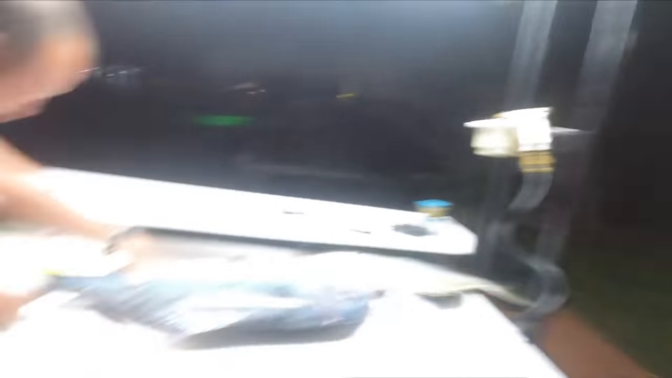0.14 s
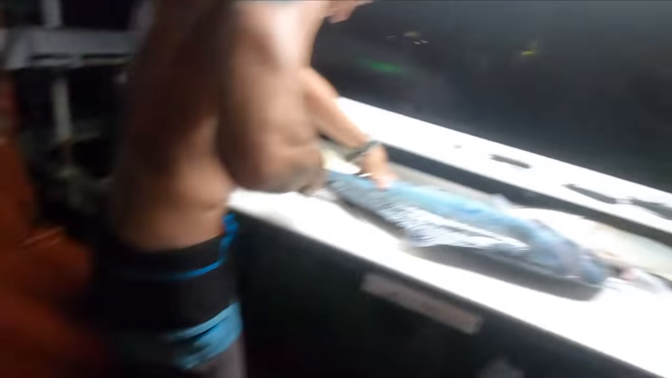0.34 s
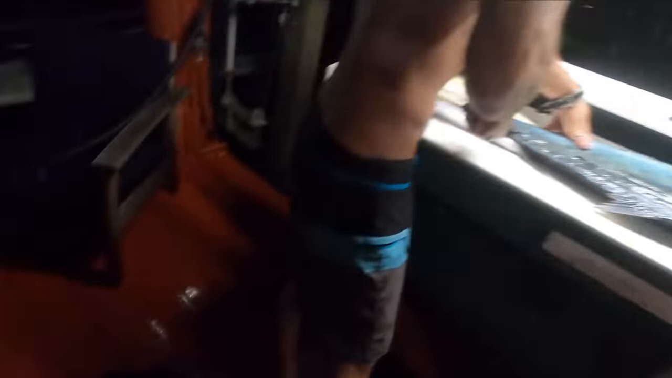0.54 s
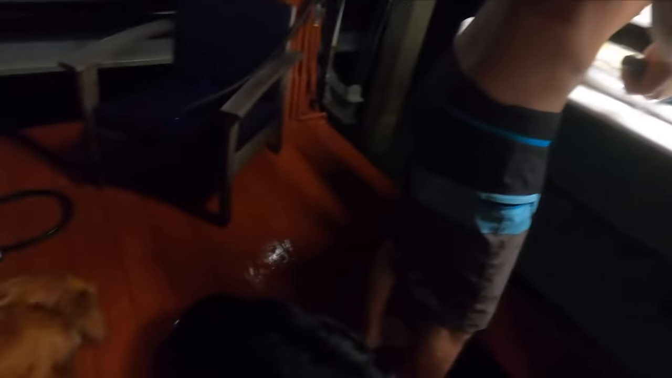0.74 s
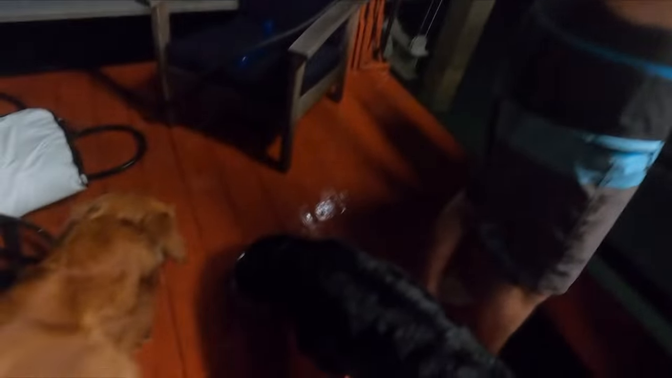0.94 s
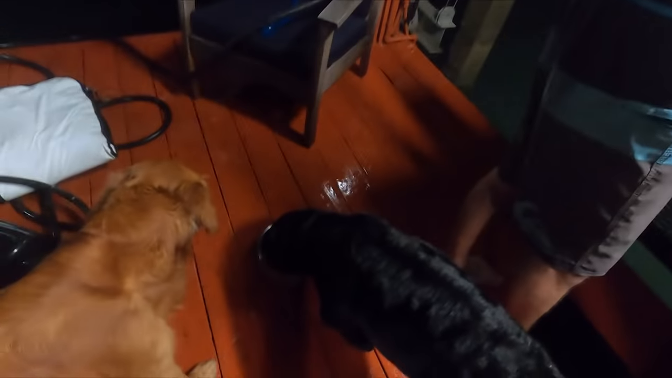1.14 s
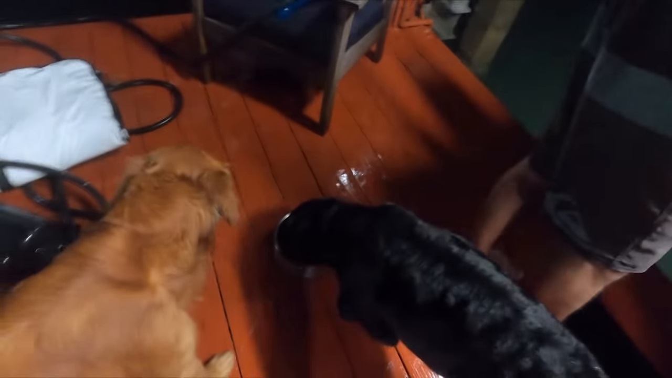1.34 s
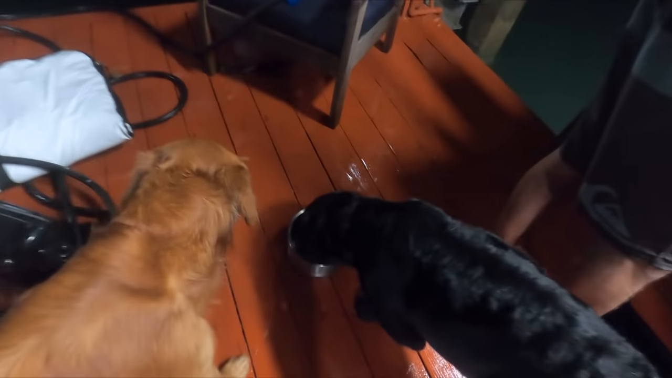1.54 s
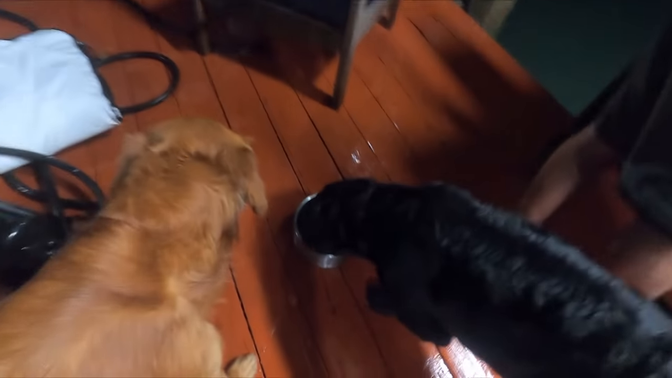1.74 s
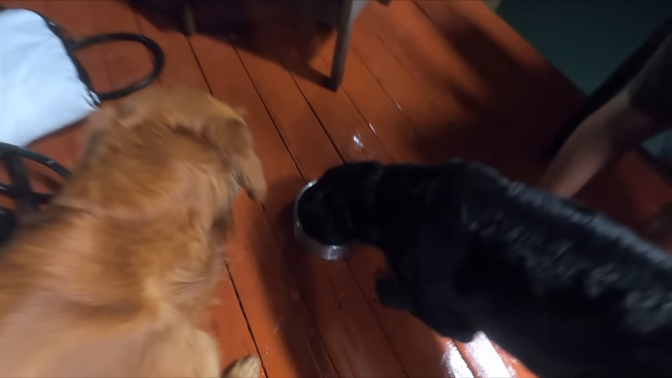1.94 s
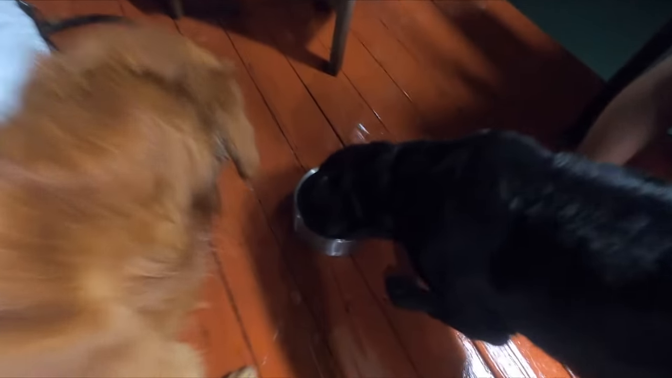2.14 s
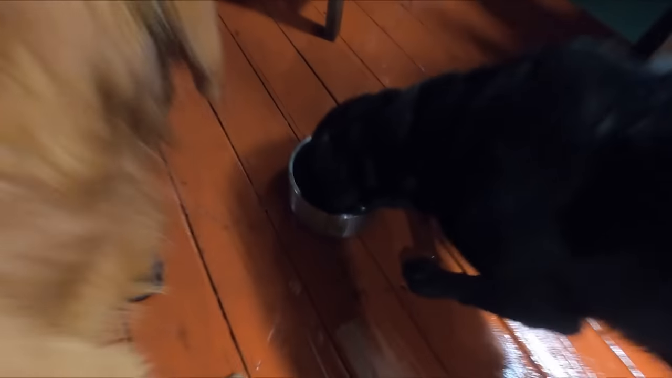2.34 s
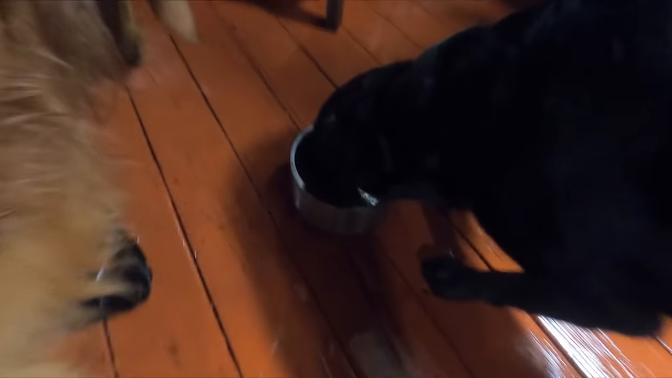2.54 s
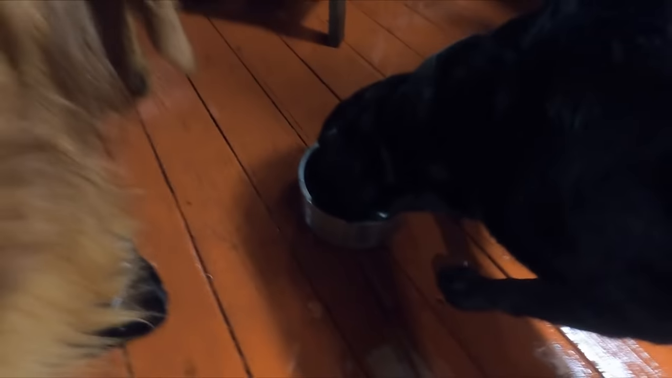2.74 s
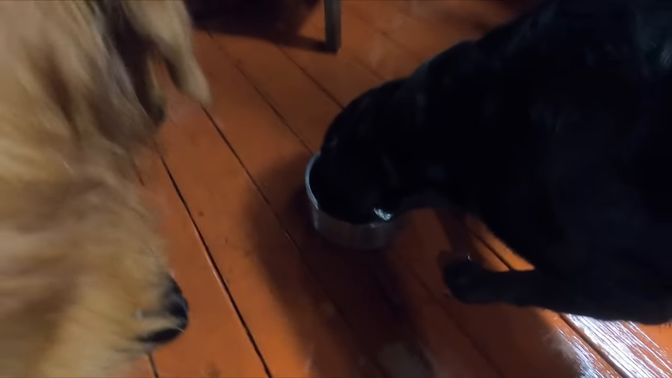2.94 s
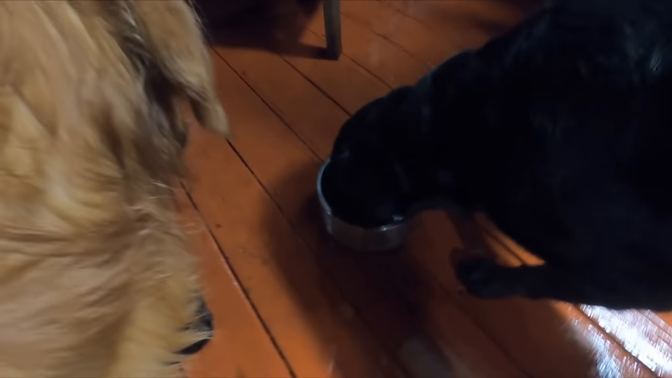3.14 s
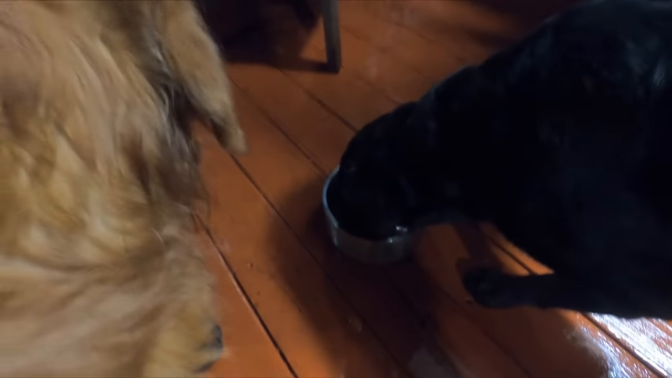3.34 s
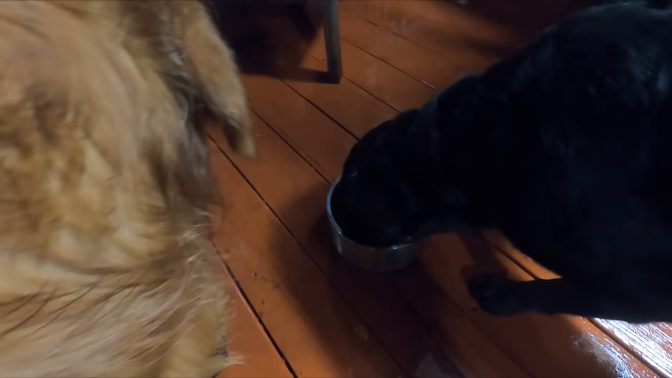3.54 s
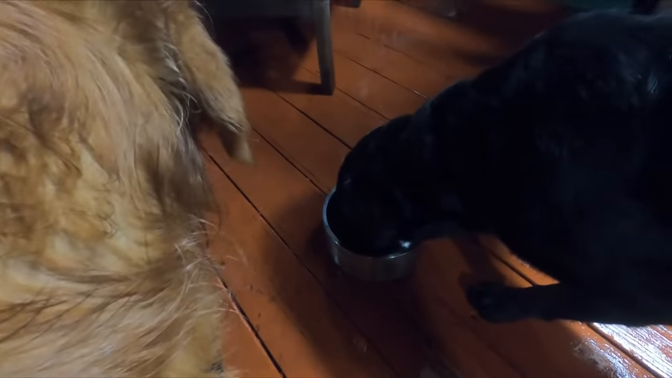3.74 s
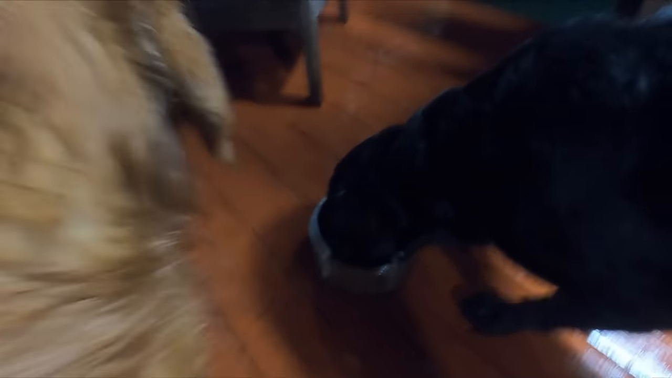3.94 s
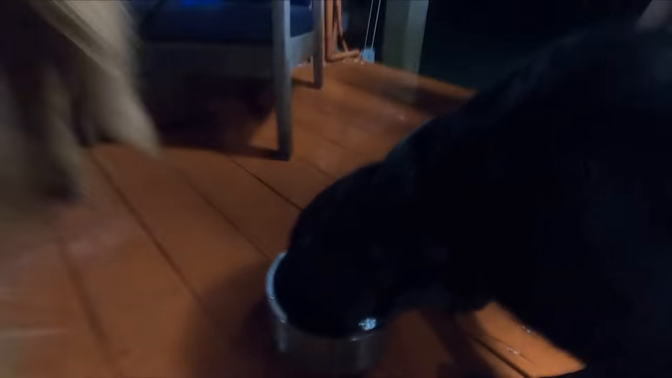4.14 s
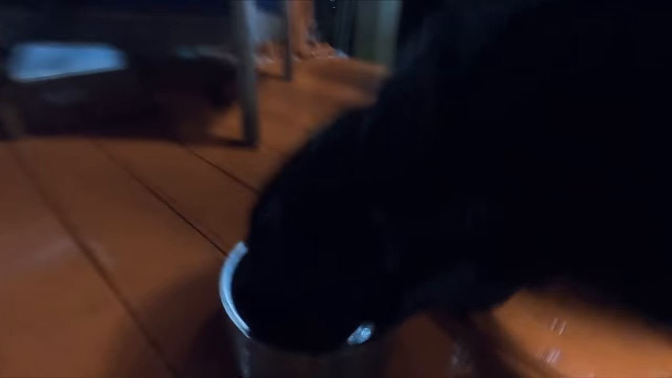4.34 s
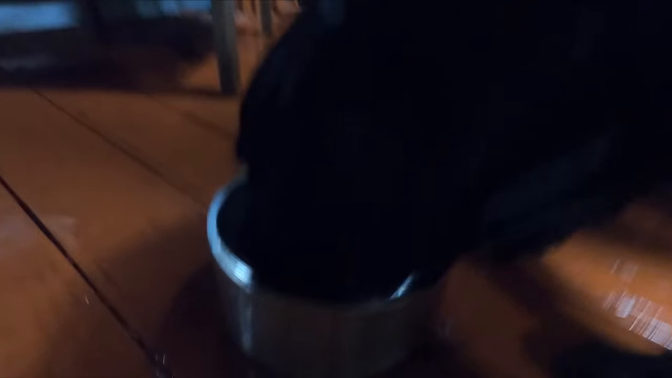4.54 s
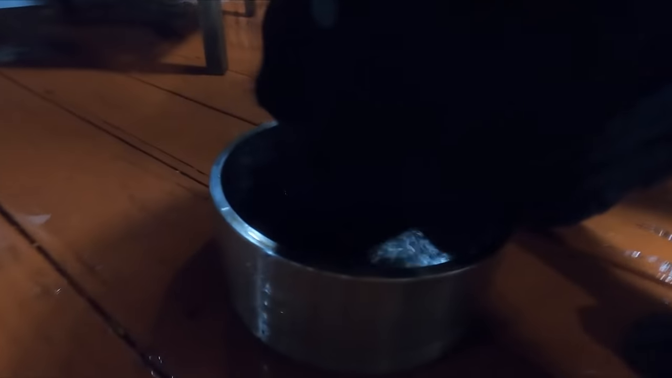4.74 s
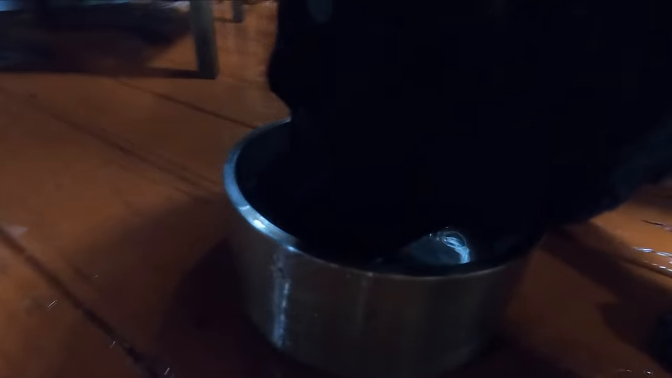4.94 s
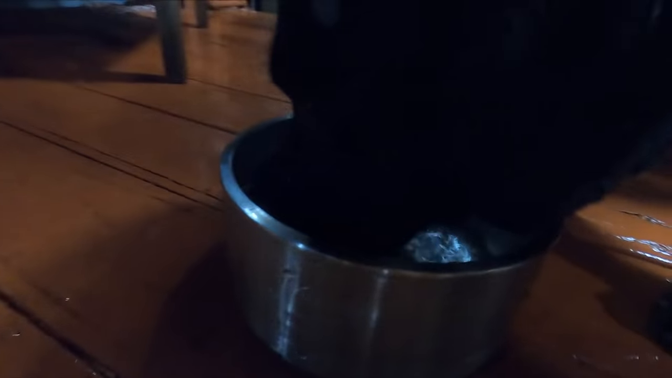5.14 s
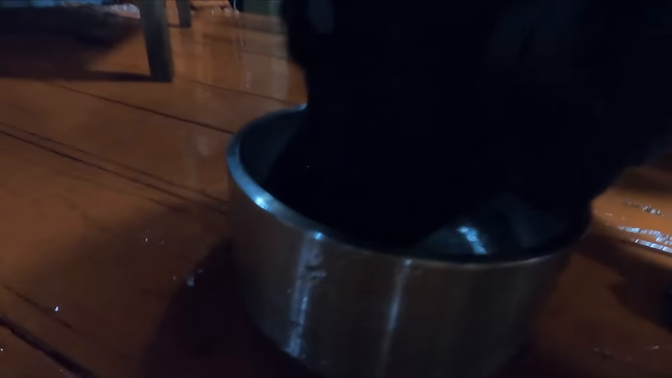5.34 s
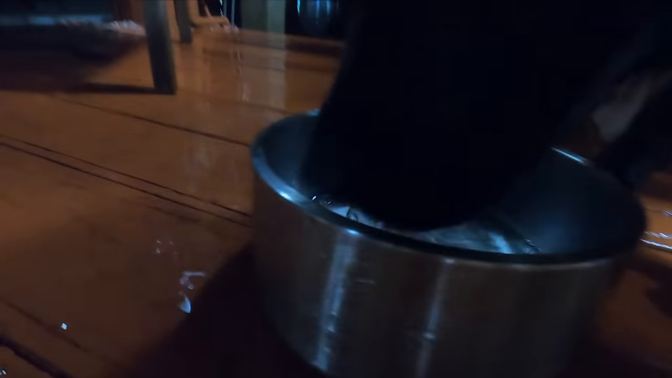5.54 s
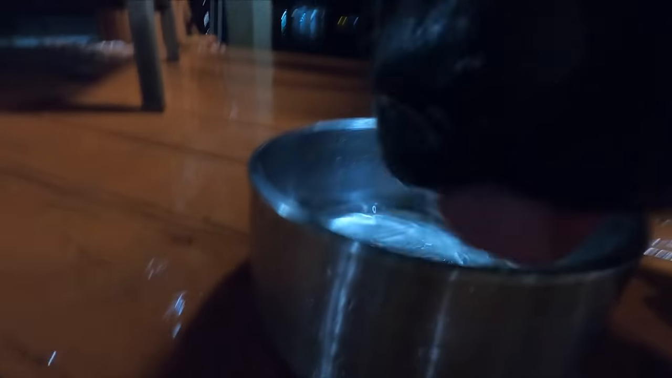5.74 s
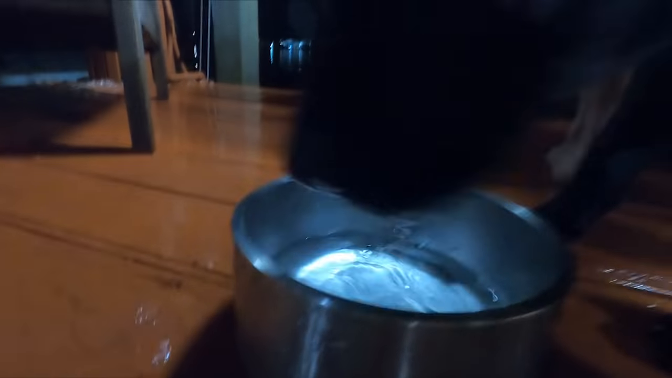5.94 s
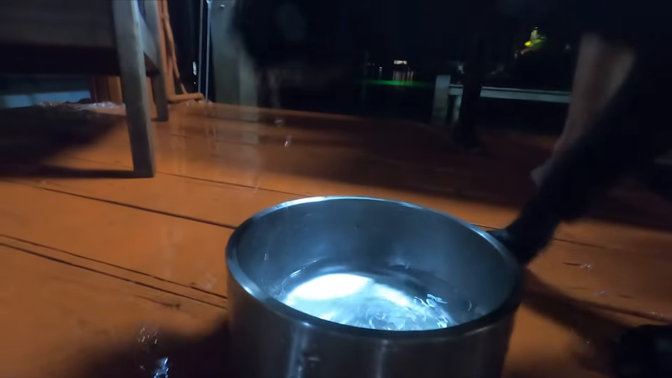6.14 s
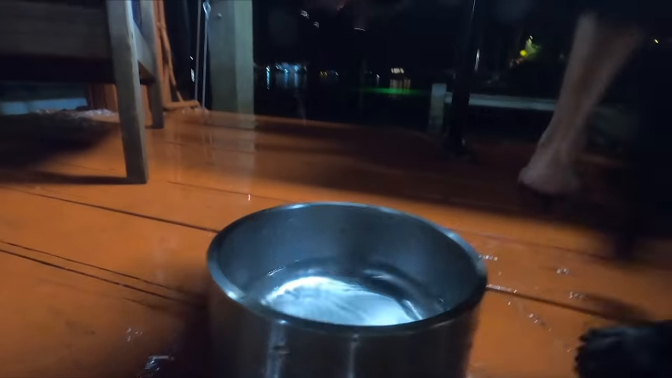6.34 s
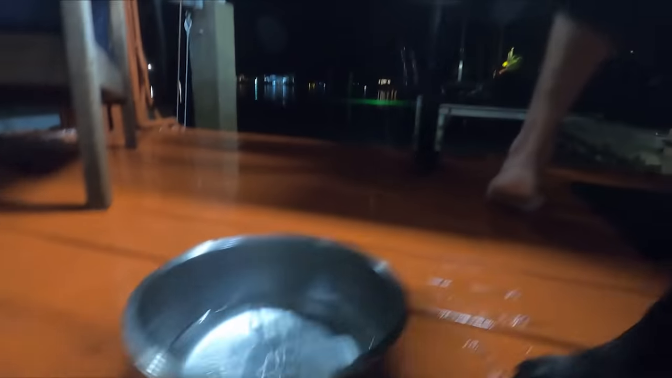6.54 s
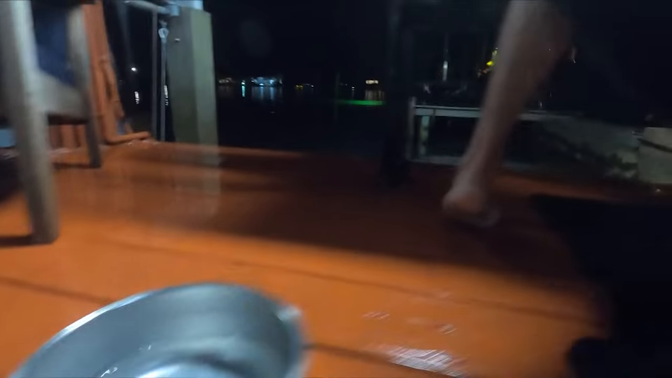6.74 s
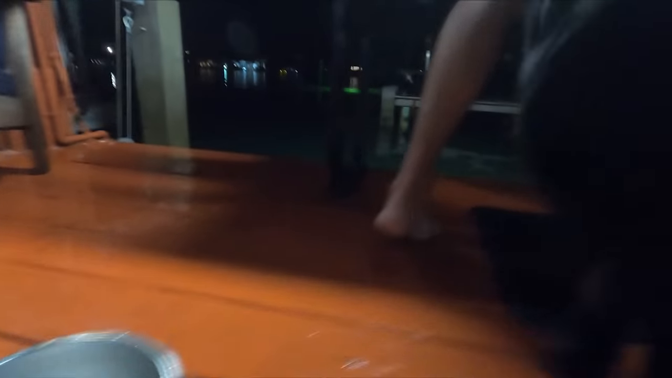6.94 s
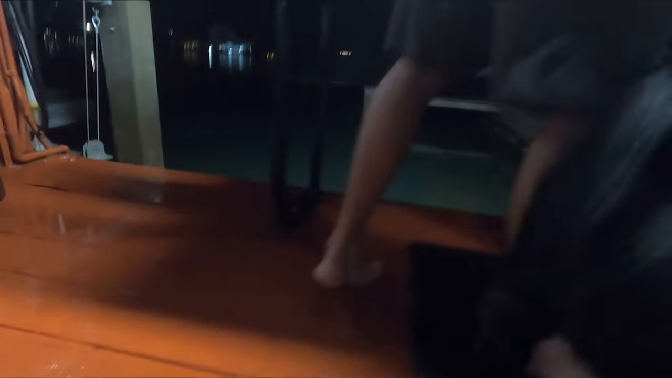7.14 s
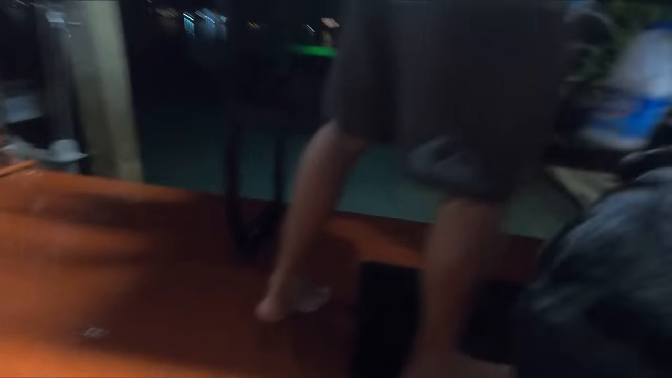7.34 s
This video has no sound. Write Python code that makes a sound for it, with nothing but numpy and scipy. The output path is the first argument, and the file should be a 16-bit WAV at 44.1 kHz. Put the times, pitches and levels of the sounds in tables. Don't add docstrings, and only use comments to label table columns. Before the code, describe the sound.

Outdoors at night, a handheld stereo microphone moves in on a drinking dog. Each lap is a liquid plunge, a bubbly scoop and a little snap of the jaw, with fine spray. The regular lapping is strongest near the bowl, then stops; steel sings briefly, drops fall, claws tap the planks and the grip bumps. Soft water hiss and low rumble lie underneath.

```python
import sys
import numpy as np
from scipy import signal
from scipy.fft import rfft, irfft
from scipy.io import wavfile
from scipy.ndimage import uniform_filter1d

SR = 44100
rng = np.random.default_rng(int(sys.argv[2]) if len(sys.argv) > 2 else 0)


def transcribe(signal):
    frames = np.atleast_2d(signal).T
    limited = np.clip(frames, -1, 1)
    pcm = np.round(limited * 32767).astype(np.int16)
    wavfile.write(sys.argv[1], SR, pcm)


def amplitude_ratio(level_db):
    exponent = np.asarray(level_db, float) / 20
    return 10 ** exponent


N = 329679

# [t/s, wash level/dB, left over right/dB]
NIGHT_TURN = [
    (0, -46, 12),
    (.9, -42, -0.5),
    (1.4, -44.5, 1),
    (2., -42, 1),
    (2.6, -48.5, -0.5),
    (4.2, -48, 0),
    (5.5, -47.5, 0),
    (6.1, -45, -0.5),
    (6.7, -48, 4.5),
    (7.48, -47, 7),
]
# [t/s, level/dB]
NEARNESS = [
    (0, -0.5),
    (2.2, -10.5),
    (2.7, -2),
    (4.1, -4.5),
    (4.7, 4),
    (7.48, 6.5),
]
# [t/s, level/dB, length/ms]
SLOPS = [(0.619, -41.5, 84), (2.47, -33.5, 46), (2.914, -33, 33), (3.087, -45, 14), (3.828, -43.5, 19),
         (4.239, -46, 29), (4.584, -38, 32), (4.8, -56, 41), (4.98, -42, 7.8), (5.599, -40, 26),
         (5.901, -42.5, 47), (6.001, -42, 13), (6.863, -67, 35), (7.27, -66, 150), (2.6, -58, 20),
         (4.735, -34.5, 13)]
# [f/Hz, level/dB per Hz]
WASH = [(300, -43), (600, -17), (900, -9.5), (1250, -1.5), (2200, 0.5), (3000, -1), (4500, -3.5),
        (9500, -17), (14600, -30), (16000, -42)]


def evened(x):
    return x / np.sqrt(np.mean(x ** 2) + 1e-20)


def read(points, hz):
    f, value = np.transpose(points)
    return np.interp(np.log(hz + 1), np.log(f + 1), value)


def follow(s, value):
    return np.interp(np.arange(N) / SR, s, value)


def add(mix, s, sound):
    part = mix[max(round(s * SR), 0):][:len(sound)]
    part += sound[:len(part)]


def bubble(hz, ring_s, rise_s, glide):
    t = np.arange(round((rise_s + 5 * ring_s) * SR)) / SR
    swell = np.sin(np.pi / 2 * np.minimum(t / rise_s, 1)) ** 2
    decay = amplitude_ratio(-8 * np.maximum(t - rise_s, 0) / ring_s)
    pitch = hz * (1 + glide * (t - rise_s) / ring_s)
    return swell * decay * np.sin(2 * np.pi * np.cumsum(pitch) / SR)


def swarm(colour, per_s, cycles, spread_db, count=30):
    place, luck, pitch = rng.random((round(per_s * N / SR), 3)).T
    size = amplitude_ratio(spread_db * np.minimum(-np.log(luck), 4))
    out = np.zeros(N + SR)
    for k, hz in enumerate(np.geomspace(colour[0][0], colour[-1][0], count)):
        ring_s = (.6 + k % 3 * .5) * cycles / hz
        grain = bubble(hz, ring_s, .55 * cycles / hz, .05 - k % 4 * .02)
        grain *= amplitude_ratio(read(colour, hz)) * np.sqrt(hz) / np.linalg.norm(grain)
        mine = (pitch * count).astype(int) == k
        at = (place[mine] * N).astype(int)[:, None] + np.arange(len(grain))
        out += np.bincount(at.ravel(), (size[mine, None] * grain).ravel(), N + SR)
    return evened(out[:N])


def bed(colour, patchy_db, flicker_db, size):
    # [f/Hz, correlation]
    likeness = [(20, 0.75), (100, 0.9), (300, 0.95), (640, .7), (3100, 0.58), (6800, 0.15), (15000, 0.1)]
    hop = size // 4
    frames, hz = N // hop + 5, np.fft.rfftfreq(size, 1 / SR)
    a, b, c, d, patches = rng.standard_normal((frames, len(hz), 5)).T
    patches = uniform_filter1d(patches, size=size // 40, axis=0)
    patches = evened(uniform_filter1d(patches, size=3072 // hop, axis=1))
    flicker = evened(uniform_filter1d(rng.standard_normal(frames), size=5))
    same = np.clip(read(likeness, hz), -1, 1)[:, None]
    left = a + 1j * b
    right = same * left + np.sqrt(1 - same ** 2) * (c + 1j * d)
    z = np.array([left, right])
    z *= amplitude_ratio(read(colour, hz)[:, None] + patchy_db * patches + flicker_db * flicker)
    return evened(signal.istft(z, nperseg=size, noverlap=size - hop)[1][:, :N])


def rumble():
    # [f/Hz, level/dB per Hz]
    rumble_colour = [(15, -18), (30, 1.5), (75, 2), (125, -4.5), (180, -8.5), (290, -18.5), (450, -23),
                     (700, -30.5), (1200, -60)]
    rumble_db = -41.5 + 0.13 * follow(*np.transpose(NEARNESS))
    return amplitude_ratio(rumble_db) * bed(rumble_colour, 1.95, 1.9, size=4096)


def drone():
    # [f/Hz, width/Hz, level/dB]
    motor_bands = [(79, 26, -49), (127, 6, -55), (172, 24, -58)]
    hz, z = np.fft.rfftfreq(N, 1 / SR), rfft(rng.standard_normal(N))
    out = np.zeros(N)
    for f, width_hz, db in motor_bands:
        out += amplitude_ratio(db) * evened(irfft(z * np.exp(-2 * ((hz - f) / width_hz) ** 2), N))
    return out


def wash(wash_db, pan_db):
    trickle = np.array([swarm(WASH[2:8], 350, 8., 3.7) for port in "LR"])
    water = bed(WASH, 2.4, 1.7, size=512) + amplitude_ratio(-4) * trickle
    return amplitude_ratio(wash_db - 3.0 + np.array([pan_db, -pan_db]) * 0.28) * water


def bumps():
    # [t/s, level/dB, f/Hz]
    pushes = [
        (6.9, -32, 45),
        (6.923, -27, 49.6),
        (7.345, -32.5, 35),
        (7.377, -31.5, 34.5),
        (7.457, -21, 40),
    ]
    out, half = np.zeros(N), SR // 20
    for s, db, hz in pushes:
        u = np.arange(-half, half) / SR * hz
        add(out, s - half / SR, -amplitude_ratio(db) * np.cos(2 * np.pi * u - .1) * np.exp(-(1.8 * u) ** 2))
    return out


def deck(x, t60, delay_s):
    t = np.arange(round(.2 * SR)) / SR
    signs = rng.choice([-1., 1.], (2, len(t)))
    sparse = rng.random((2, len(t))) < .05
    taps = signs * sparse * amplitude_ratio(-60 * t / t60) * (t > delay_s)
    return signal.oaconvolve(x[None], taps / np.linalg.norm(taps[0]), axes=1)[:, :N]


def bowl():
    # [t/s, level/dB, f/Hz, t60/s, beat/Hz]
    brushes = [(5.54, -45, 2790, .4, 3), (5.727, -48, 2372, 0.9, 5.1), (6.04, -45, 2362, 0.95, 2.5),
               (6.079, -46.5, 1478, 1.2, 3.6), (6.0777, -27, 1390, .12, 2), (6.0777, -35, 1206, .075, 5),
               (6.08, -55, 1782, .7, 9), (6.078, -42, 1970, .17, 20), (6.08, -54, 1114, .6, 3),
               (6.079, -44, 1885, 0.4, 8), (6.078, -35, 1012, .09, 3), (6.0777, -33, 1490, .07, 9)]
    out, t = np.zeros(N), np.arange(SR // 2) / SR
    for s, db, hz, t60, beat_hz in brushes:
        sway = evened(uniform_filter1d(rng.standard_normal(len(t)), size=4000))
        phase = 2 * np.pi * np.cumsum(hz * (1 + .0007 * sway)) / SR
        pair = np.sin(phase) + 1.24 * np.sin(phase + 2 * np.pi * beat_hz * t + 1.05)
        pair *= amplitude_ratio(4 * t * sway[::-1])
        add(out, s, np.minimum(t / .0015, 1) * amplitude_ratio(db - 60 * t / t60) * pair)
    return out


def bursts(rows, gain_db, length_s, decay_s, band_hz):
    out, t = np.zeros(N), np.arange(round(length_s * SR)) / SR
    for (s, db, *_), fizz in zip(rows, rng.standard_normal((len(rows), len(t)))):
        add(out, s, amplitude_ratio(db + gain_db) * fizz * np.exp(-t / decay_s))
    return signal.lfilter(*signal.butter(2, band_hz, "band", fs=SR), out)


def ticks():
    # [t/s, peak level/dB]
    films = [
        (0.333, -43),
        (3.226, -55),
        (4.7197, -52),
        (4.7666, -44),
        (4.8389, -52),
        (5.5353, -53),
    ]
    return bursts(films, 13.0, 0.0048, 0.0018, [7000, 13500])


def knocks():
    return bursts(SLOPS, 16., 0.011, 0.003, [350, 1400])


def snaps():
    # [t/s, peak level/dB]
    sharp_snaps = [(2.133, -22), (2.9155, -33), (2.6, -21), (4.714, -29), (4.772, -16.5), (4.8305, -23),
                   (1.138, -42), (1.8, -23), (4.03, -19), (5.126, -37), (5.146, -42), (5.509, -27),
                   (5.8746, -18), (5.886, -26), (6.3655, -35), (6.4034, -26.5), (6.506, -24.5),
                   (6.8665, -22)]
    out, t = np.zeros(N), np.arange(round(0.011 * SR)) / SR
    for (s, db), fizz in zip(sharp_snaps, rng.standard_normal((len(sharp_snaps), len(t)))):
        edge = (1 - t / 6e-5) * np.exp(-t / 6e-5)
        add(out, s, amplitude_ratio(db + 8.0) * (edge + 0.27 * fizz * np.exp(-t / 0.0057)))
    return signal.lfilter(*signal.butter(2, [500, 5500], "band", fs=SR), out)


def strokes():
    # [f/Hz, level/dB]
    churn_colour = [(400, -7.5), (700, 0), (1200, 4.5), (1700, 0.5), (2300, -27)]
    spray_colour = [(1800, -6.5), (2600, -3.5), (4500, -11.5), (6500, -13.5), (9000, -16.5), (12000, -37),
                    (15500, -34)]
    # [t/s, level/dB, length/ms]
    plunges = [(0.302, -37, 43), (0.612, -41.5, 96), (1.021, -30, 44), (1.333, -32.5, 81), (1.733, -31, 63),
               (2.057, -35.5, 61), (2.464, -28.5, 24), (2.8, -29, 45), (3.209, -30, 51), (3.55, -26, 52),
               (3.96, -30, 50), (4.304, -28.5, 82), (4.704, -27, 47), (5.042, -28, 68), (5.462, -24, 21.3),
               (5.861, -40, 36)]
    scoops = [(0.015, -52.5, 29), (0.33, -57.5, 130), (0.7, -54.5, 80), (1.084, -43.5, 33),
              (1.395, -46.5, 38), (1.799, -49.5, 60), (2.127, -43, 30), (2.5, -49, 46), (2.526, -49.5, 62),
              (2.826, -47.5, 45), (3.255, -42.5, 59), (3.598, -58, 39), (4.023, -47, 69), (4.35, -51, 30),
              (4.375, -39.5, 16), (4.752, -43.5, 58), (5.108, -46, 50), (5.45, -43, 7.9),
              (5.498, -41.5, 26), (5.531, -46, 21), (5.568, -48, 18), (5.6, -64, 98)]
    bites = [(0.411, -43.5, 24), (0.745, -49, 86), (1.132, -30, 31), (1.453, -36.5, 38.5),
             (1.85, -37, 37.6), (2.18, -34, 43.8), (2.595, -38, 27.4), (2.874, -31, 24), (2.91, -36.5, 48),
             (3.331, -40, 43.6), (3.628, -31.5, 28), (3.665, -31, 40.7), (4.09, -35, 35.8),
             (4.414, -34.5, 43), (4.826, -33.5, 41.7), (5.155, -27.5, 33.6), (5.899, -49, 46)]
    drips = [(0.98, -49, 28), (1.951, -49.5, 55), (5.723, -49, 14), (5.825, -52, 92), (5.969, -46, 25),
             (6.001, -42, 14.6), (6.033, -47, 12), (6.363, -46.5, 26), (6.4, -47.5, 15), (6.475, -56, 21),
             (6.502, -58, 150), (6.86, -51.5, 52), (7.128, -47, 12)]
    # churn dB, spray dB, gulp dB
    kinds = ((plunges, (0., -15, -10.5)), (scoops, (4.4, 0., -1.5)), (bites, (0., -13, -7)),
             (drips, (-2, 0., -6)), (SLOPS, (-1.3, -21, -0.23)))
    settle_db, settle_s = -25, 0.11
    churn, spray, gulp = np.zeros((3, N))
    for rows, (churn_db, spray_db, gulp_db) in kinds:
        for s, db, length_ms in rows:
            t = np.arange(round((2 * length_ms / 1e3 + 4 * settle_s) * SR)) / SR
            moving = np.exp(-(t * 1e3 / length_ms) ** 3)
            fade = amplitude_ratio(db) * (moving + amplitude_ratio(settle_db) * np.exp(-t / settle_s))
            thrown_db = spray_db + 8.0 - 0.43 * max(db + 33, 0)
            add(churn, s, amplitude_ratio(churn_db + 0.5) * np.minimum(t / 0.0046, 1) * fade)
            add(spray, s, amplitude_ratio(thrown_db) * np.minimum(t / 0.0093, 1) * fade)
            add(gulp, s, amplitude_ratio(gulp_db) * np.minimum(t / 0.0047, 1) * fade)
    gulp *= amplitude_ratio(follow(*np.transpose(NEARNESS)))
    slosh = [(200, -11.0), (320, -11), (450, -11.5), (650, -11.0)]
    body = churn * amplitude_ratio(-2.0) * swarm(churn_colour, 380, 4.27, 3.4)
    body += gulp * swarm(slosh, 320, 1.0, 2.6)
    drops = amplitude_ratio(-1.0) * spray * swarm(spray_colour[:4], 1300, 4.06, 3.7)
    mist = spray * np.array([swarm(spray_colour[2:], 2200, 4.5, 3.9) for port in "LR"])
    return body + drops, amplitude_ratio(-10.0) * mist


def bubbles():
    # [t/s of the peak, peak level/dB, f/Hz]
    pockets = [(1.094, -28.5, 600), (1.43, -34.5, 654), (1.757, -21.5, 783), (2.4801, -21.5, 770),
               (2.8131, -19, 810), (2.8371, -23.5, 790), (2.8839, -12.5, 586), (2.9273, -24, 587),
               (3.232, -27, 515), (3.2441, -23.5, 620), (3.5741, -38, 613), (3.5829, -32, 785),
               (3.6375, -19.5, 610), (3.6732, -23.5, 630), (4.31, -25.5, 875), (4.3154, -19.5, 800),
               (4.3327, -16, 440), (4.7158, -18.5, 550), (4.727, -25, 645), (4.839, -22, 327),
               (5.0741, -9.5, 794), (5.1283, -12, 655), (5.159, -19, 574), (5.1653, -25, 348),
               (5.9033, -13.5, 703), (5.93, -29, 640)]
    plops = [(0.312, -23.5, 1357), (0.717, -26, 1580), (1.0351, -24, 1280), (1.3559, -12.5, 1290),
             (1.3658, -23, 1480), (1.743, -15.5, 1480), (2.0794, -16, 1470), (2.473, -17.5, 1220),
             (2.4804, -16, 1340), (2.801, -15.5, 1050), (2.806, -11.5, 1000), (2.9267, -20, 1130),
             (3.211, -19, 1050), (3.2276, -12, 1320), (3.245, -19, 1170), (3.3482, -21, 1270),
             (3.551, -23, 1190), (3.5587, -21, 1105), (3.5654, -20, 1290), (3.9641, -24.5, 1190),
             (3.995, -22.5, 1480), (4.7158, -7, 1320), (4.728, -23.5, 1080), (4.85, -14, 1225),
             (5.052, -11.5, 980), (5.061, -17, 1170), (5.071, -6.5, 1070), (5.1273, -9.5, 1690),
             (5.1732, -19, 1126), (5.47, -9.5, 1040)]
    beads = [(1.14, -17.5, 2340), (1.412, -25.5, 4560), (1.4627, -25, 2650), (1.806, -21.5, 3000),
             (1.8072, -19.5, 1820), (1.8747, -21, 2350), (2.1035, -20.5, 3920), (2.1325, -16.5, 3080),
             (2.1846, -20.5, 3580), (2.5353, -17, 2480), (2.8807, -24.5, 2460), (2.935, -22.5, 2970),
             (3.2743, -22, 6200), (3.5751, -17.5, 3290), (3.6048, -23.5, 2440), (3.6318, -21.5, 4000),
             (3.6896, -13.5, 2280), (4.0296, -21.5, 3210), (4.0388, -15.5, 1930), (4.1069, -16, 1840),
             (4.341, -19, 2390), (4.3621, -18.5, 4050), (4.381, -9, 2340), (4.7645, -7.5, 2470),
             (4.7753, -9.5, 1930), (4.8502, -21.5, 4020), (5.078, -15.5, 2380), (5.1466, -24, 3030),
             (5.506, -13, 2090), (5.6458, -21.5, 2670)]
    singers = [(0.708, -33.5, 1505), (1.8668, -32, 2450), (2.5093, -30, 1720), (3.6061, -28, 1670),
               (3.6337, -24, 1600), (4.0967, -29, 2440), (4.3327, -24.5, 2300), (4.3356, -22.5, 1077),
               (4.382, -19, 1666), (4.7547, -20, 2230), (5.0937, -24, 2280), (5.4606, -30, 1625),
               (5.5269, -26.5, 2070), (5.5369, -22, 3220), (5.727, -33, 2420), (5.8799, -29, 1217)]
    froth = [(1.0313, -27, 1280), (1.1401, -22, 1700), (1.4125, -27, 1260), (1.4755, -27, 1130),
             (1.7373, -21, 960), (1.8069, -29, 1120), (1.8674, -32, 1550), (2.4925, -31, 1340),
             (2.4983, -32, 1390), (2.6052, -23, 1200), (2.8207, -22.5, 1100), (2.8278, -22, 580),
             (2.8433, -26, 880), (2.8501, -29, 1310), (2.9165, -24.5, 424), (2.9348, -22, 1160),
             (3.2359, -27, 1110), (3.3564, -22.5, 990), (3.5738, -21.5, 1290), (3.5744, -21.5, 663),
             (3.5789, -24, 1240), (3.5833, -16, 770), (3.6894, -18.5, 1600), (3.9694, -21, 1180),
             (4.0253, -29, 1540), (4.0308, -27, 1620), (4.0405, -24, 657), (4.0492, -33, 1810),
             (4.0966, -27, 946), (4.1111, -22, 1180), (4.3248, -23, 527), (4.3593, -30, 1410),
             (4.708, -25.5, 1450), (4.7339, -24, 1030), (4.7379, -25, 694), (4.7725, -24.5, 1120),
             (4.8088, -26, 1600), (4.8311, -20.5, 550), (5.0645, -9, 1140), (5.075, -16.5, 1680),
             (5.1137, -21.5, 1550), (5.142, -29, 630), (5.1806, -28, 794), (5.5073, -26.5, 1170)]
    flecks = [(1.1522, -26, 2400), (1.4029, -27, 2450), (1.4769, -33, 4520), (1.4775, -27, 3800),
              (1.8676, -29, 5750), (1.8677, -24, 3730), (1.8823, -23, 2450), (1.8829, -32, 3570),
              (2.1332, -27, 6900), (2.1337, -25, 3770), (2.4724, -20.5, 2490), (2.4811, -30, 6700),
              (2.5173, -32, 3100), (2.537, -30, 3530), (2.6022, -30, 4040), (2.8077, -29.5, 2600),
              (2.8263, -26.5, 5340), (2.8484, -28, 5500), (2.8789, -25.5, 4450), (2.9157, -28, 8060),
              (2.9421, -28, 2660), (3.2606, -32, 2540), (3.2627, -32, 4180), (3.2768, -27, 3060),
              (3.2878, -26, 2600), (3.5659, -25, 6100), (3.5799, -26.5, 4440), (3.6816, -27, 6400),
              (3.6892, -27, 4240), (4.0296, -32, 4250), (4.0384, -20, 2580), (4.0395, -29, 3600),
              (4.1058, -23.5, 2430), (4.1061, -22.5, 4300), (4.3622, -22, 3110), (4.3727, -27, 3120),
              (4.3775, -29, 4050), (4.463, -28, 2150), (4.7752, -31, 3700), (4.7818, -26, 3470),
              (4.7859, -23, 2490), (4.8309, -22.5, 2220), (5.0766, -26, 4750), (5.1109, -27, 2540),
              (5.1303, -27, 2720), (5.1672, -24, 2170), (5.1713, -24, 2500), (5.4986, -22, 2860),
              (5.4988, -27, 2250), (5.5082, -20.5, 3080), (5.5098, -17.5, 5000), (5.5099, -18.5, 4570),
              (5.5354, -26.5, 6290), (5.6329, -27, 3180), (5.6557, -29, 4570), (5.8315, -30, 4230),
              (5.8639, -29, 5460), (5.8767, -32, 5520), (5.8853, -31, 4310), (5.9079, -31, 3680)]
    drops_and_taps = [(0.1322, -35, 2930), (0.4173, -28, 2390), (3.315, -28, 1570), (5.6462, -12.5, 4100),
                      (5.6549, -23.5, 2220), (5.8307, -24, 3300), (5.8702, -22, 1500), (5.8769, -19, 6940),
                      (5.8851, -22, 2560), (5.8978, -19.5, 3620), (5.9013, -23, 1240), (5.9288, -24, 1400),
                      (5.98, -30, 2050), (6.0061, -26, 4630), (6.0428, -27, 2130), (6.0795, -27, 1660),
                      (6.127, -36, 2450), (5.937, -30, 2400), (6.48, -33, 1700), (5.993, -32, 2000),
                      (7.036, -44, 400), (7.136, -36, 1620), (7.145, -40, 290), (7.226, -47, 1050),
                      (7.241, -45, 1060), (7.238, -46, 1450), (7.271, -44, 1030), (7.293, -46, 1180),
                      (7.329, -46, 1150), (7.29, -45, 420), (7.322, -44, 490), (7.36, -42, 463),
                      (7.393, -44, 440),
                      (0.3204, -34.5, 597), (0.334, -31, 5000), (0.6355, -34, 337), (0.642, -36, 1250),
              (0.7531, -33, 1180), (1.1399, -29, 1100), (2.133, -24, 2300), (2.1339, -19, 3730),
              (2.4711, -23, 856), (3.575, -25.5, 2670), (3.9784, -26, 1690), (3.983, -25, 1320),
              (4.31, -25, 1060), (4.3775, -21, 3450), (4.7309, -35, 1430), (4.8306, -20, 1010),
              (4.8496, -28, 1750), (4.869, -30, 1125), (4.8519, -25.5, 3460), (5.4715, -15, 1720),
              (5.5085, -17, 3190), (5.8644, -33, 3440), (5.872, -33, 2180), (5.8845, -32, 3280),
              (5.9755, -35, 3450), (5.9756, -32, 2470), (6.0014, -28, 2220), (6.0074, -30, 308),
              (6.0415, -31, 2800), (6.049, -32, 1860), (6.3667, -30, 3520), (6.3742, -37, 2240),
              (6.5066, -29, 4530), (6.8667, -31, 4820)]
    claws = [(6.3668, -16, 4620), (6.3675, -23, 6520), (6.374, -20, 1620), (6.5062, -21, 3410),
             (6.5066, -26.5, 1740), (6.8666, -22, 3500), (6.868, -34, 1400), (6.88, -37, 4470),
             (6.882, -34, 1020), (6.634, -32.5, 3300), (6.635, -43, 1450), (6.944, -34, 4000)]
    groups = ((pockets + plops + beads, 1), (singers, 2.33), (froth, 0.68), (flecks, 0.91),
              (drops_and_taps, 0.98), (claws, 0.33))
    ring_ms = 3.15
    out = np.zeros(N)
    for rows, ring in groups:
        for (s, db, hz), glide in zip(rows, rng.uniform(-0.027, 0.0726, (len(rows), 1))):
            hardness = amplitude_ratio(0.56 * (-17 - max(db, -25.5)))
            ring_s = ring * ring_ms / 1e3 * (1e3 / hz) ** 0.57 * hardness
            rise_s = 1.212 / hz + 0.42 * ring_s / np.sqrt(ring)
            add(out, s - rise_s, amplitude_ratio(db) * bubble(hz, ring_s, rise_s, glide))
    return out


def scene():
    s, wash_db, pan_db = np.transpose(NIGHT_TURN)
    wash_db, pan_db = follow(s, wash_db), follow(s, pan_db)
    night = rumble() + drone() + wash(wash_db, pan_db)
    stirred, mist = strokes()
    water = bubbles() + stirred + snaps() + knocks() + bowl()
    lag = np.exp(-2j * np.pi * np.fft.rfftfreq(N) * 1.57)
    ports = np.array([amplitude_ratio(-1.04) * irfft(rfft(water) * lag, N), water])
    near = ports + mist + ticks() + amplitude_ratio(-13.5) * deck(water, .08, .001)
    near *= amplitude_ratio(np.array([pan_db / 2, -pan_db / 2]))
    return near + night + bumps() * amplitude_ratio(np.array([[-4], [3]]))


def low_pass(x):
    return signal.sosfilt(signal.butter(12, 16460, fs=SR, output="sos"), x)


def record(dry):
    edge = signal.firwin(255, 15750, window=("kaiser", 9), fs=SR)
    return low_pass(signal.oaconvolve(dry, edge[None], "same"))


dry = scene()
out = record(dry)
transcribe(out)
```